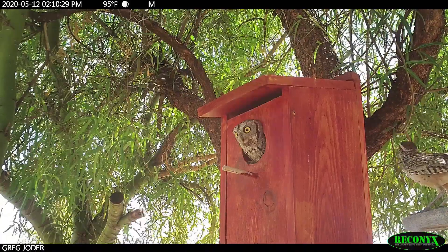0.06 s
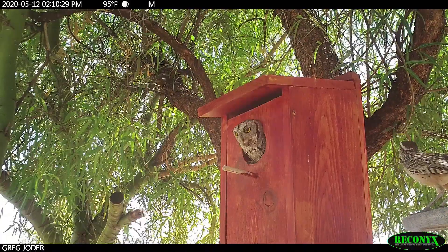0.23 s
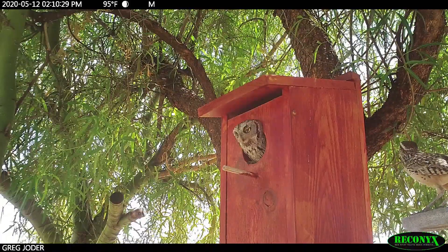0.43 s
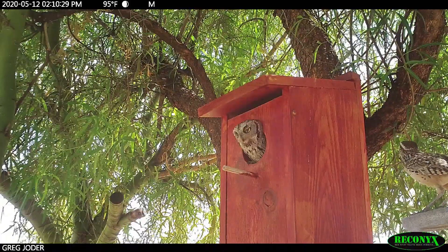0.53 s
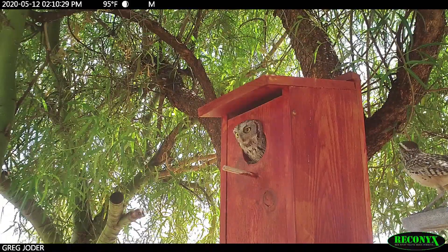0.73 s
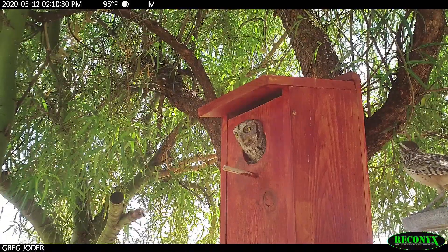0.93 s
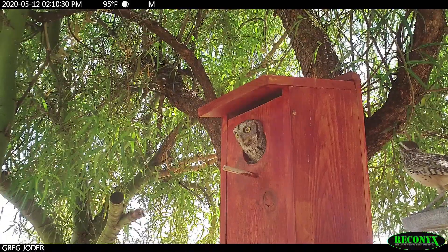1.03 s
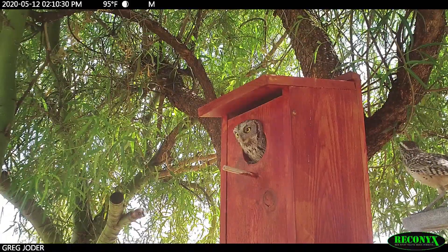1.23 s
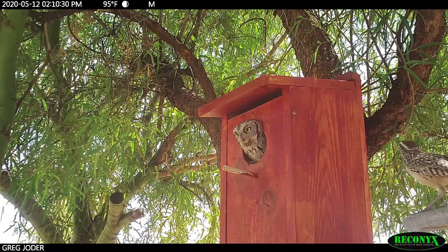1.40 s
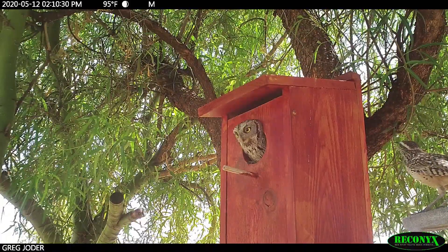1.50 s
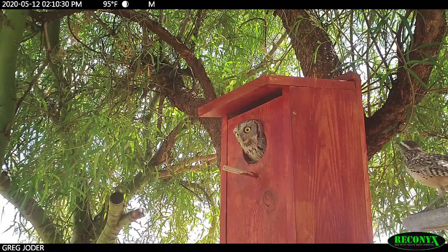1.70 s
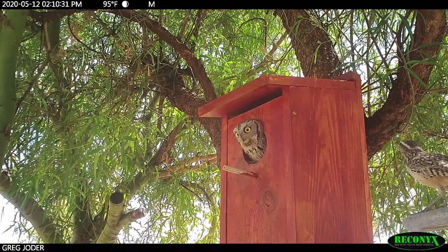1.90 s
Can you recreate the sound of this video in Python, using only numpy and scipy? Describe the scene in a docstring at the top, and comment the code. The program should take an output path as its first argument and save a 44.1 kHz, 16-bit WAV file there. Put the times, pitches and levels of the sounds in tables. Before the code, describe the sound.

Harsh buzzy chatter of a scolding wren near a nest box, ending with a soft wing flutter

```python
"""A wren on a branch close to the microphone is heard first, fading in, scolding in seven rasps.
Each rasp is a run of fast throbs, and each throb is a cluster of clicks ringing in throat and beak.
A rustle of wings follows, made of dense noise grains under a quick rise and decay, and one short chip.
Far off are thin falling whistles and a faint two-partial hoot, made of sines, and a low rumble of
filtered noise. Two close microphone ports receive the sound with a phase difference."""
import sys
import numpy as np
from scipy import signal
from scipy.fft import rfft, irfft
from scipy.io import wavfile

SR = 44100
rng = np.random.default_rng(int(sys.argv[2]) if len(sys.argv) > 2 else 0)


def file_out(sig):
    """Save sig as 16-bit WAV at sys.argv[1]."""
    # one column per channel
    cols = np.atleast_2d(sig).T
    # limit, then scale
    lim = np.clip(cols, -1, 1)
    pcm = np.round(lim * 32767).astype(np.int16)
    wavfile.write(sys.argv[1], SR, pcm)


N = 85995
T = np.arange(N) / SR

# Timing of each rasp: (first throb [s], last throb [s], throbs [count])
RASP_TIMES = [(-.045, .1105, 20), (.157, .303, 19), (.356, .5305, 23), (.588, .768, 24), (.856, 1.076, 28),
              (1.1925, 1.4, 26), (1.472, 1.6205, 19)]
# Strength of each rasp before VOICE_GAIN_DB:
# (level [dB], rise over the rasp [dB], weakness of the first throb [dB])
RASP_LEVELS = [(-19.5, -9.5, 15), (-20, -2.2, 11), (-20.5, 4, 4.5), (-19, 3.9, 9.5), (-19, 4.6, 16.5),
               (-19.5, 0.7, 13), (-19, -1.9, 14.5)]
# Relative strength of the successive clicks in a throb: level [dB]
CLICK_LEVELS = [-4, 0, 0, -4, -12, -20]
# Throat resonances, driven by longer puffs: (frequency [Hz], width [Hz], relative level [dB])
THROAT_MODES = [(1502, 128, -23.5), (2072, 350, -18.5), (2780, 560, -15), (4495, 430, -26.5)]
# Beak resonances, driven by the clicks: (frequency [Hz], width [Hz], relative level [dB])
BEAK_MODES = [(5340, 1630, -15.5), (6193, 1015, 4), (7850, 945, 0.5), (8506, 320, -1), (9570, 330, -21)]
# Relative spectrum of the wing rustle: (frequency [Hz], level per Hz [dB])
WING_SPECTRUM = [(500, -20), (1000, -20), (1650, -7.5), (2500, -16), (4500, -11.5), (6800, -1), (10200, -4),
                 (12000, -15), (15000, -49)]
# Far whistles: (start [s], end [s], first frequency [Hz], last frequency [Hz])
WHISTLE_GLIDES = [(1.62, 1.705, 5150, 4600), (1.76, 1.89, 4650, 4200), (1.775, 1.835, 5350, 5050),
                  (1.14, 1.18, 6450, 6350)]
# Strength of each whistle: level [dB]
WHISTLE_LEVELS = [-56, -61, -61, -62]
# Far hoot, fundamental and second partial: (start [s], end [s], frequency [Hz])
HOOT_TONES = [(.81, .93, 808), (.77, .823, 1616), (.829, .87, 1616)]
# Strength of each hoot tone: level [dB]
HOOT_LEVELS = [-63, -60, -59]
# Relative spectrum of the background air: (frequency [Hz], level per Hz [dB])
AIR_SPECTRUM = [(20, -7), (40, 0), (80, -16.5), (200, -28), (450, -43), (800, -39), (1300, -44.5),
                (4000, -48.5), (7000, -54), (15000, -59)]
# Course of the rumble and hums: (time [s], level [dB])
RUMBLE_LEVELS = [(0.3, -68.5), (0.68, -59.5), (1.118, -60.5), (1.38, -56.5), (1.71, -59), (1.83, -53.5),
                 (1.95, -57.5)]
# Hums in the rumble: (frequency [Hz], width of each of two resonances [Hz], level relative to RUMBLE_LEVELS [dB])
HUM_BANDS = [(55, 9, 3), (118, 12, -7), (160, 12, -12)]
# Correlation of the air between the ports: (frequency [Hz], likeness [-1 to 1])
PORT_LIKENESS = [(60, 0.83), (180, 0.7), (550, 0.69), (1650, 0.54), (4970, 0.02), (15000, 0.44)]
# Phase lag of the left port behind the right: (frequency [Hz], lag [rad])
PORT_LAG = [(300, .1), (3100, .35), (4100, 1.1), (5500, 1.85), (7900, 2.0), (9500, 2.8), (11500, 3.3),
            (15000, 4.5)]
# Steady offset, one row per port: (offset [full scale])
PORT_OFFSET = [
    [.002],
    [.0052],
]

# Throbs: timing curvature, standard deviations, time for the first throb's weakness to vanish
SLOWING, THROB_JITTER_S, THROB_SPREAD_DB = .025, .00025, .4
ATTACK_S, LAST_THROB_DB = .02, -8
CLICK_GAP_S, CLICK_JITTER_S, CLICK_SPREAD_DB = .0011, .00025, 1.5
TICK_LEAD_S, TICK_DB = .0055, -21  # relative to the rasp level
# Excitation: exponential decay times, noise and click shares, breath relative to the throbs
BEAK_PUFF_S, THROAT_PUFF_S, PUFF, THROAT_CLICK, BREATH_DB = .00025, .0018, .25, .6, -28
TOP_HZ, BOTTOM_HZ = 10800, 1160
TREBLE_HZ, TREBLE_DB, BODY_DB, VOICE_GAIN_DB = 9700, -26.5, -36, 26.5
WING_S, WING_ATTACK_S, WING_HOLD_S, WING_T60_S = 1.727, .01, .03, .16
WING_GRAINS_PER_S, WING_DB = 1700, -34.5
CHIP_S, CHIP_HZ, CHIP_T60_S, CHIP_DB = 1.862, 7000, .04, -46
NEAR_T60_S, NEAR_DB, ECHO_T60_S, ECHO_DB = .08, -16, .3, -24
HISS_DB = -57.5
# Left port gains; the right port has the opposite sign
LEFT_DB, LEFT_BASS_DB = -.5, -1.0
CEILING, STOPBAND_HZ = .36, 16100
FADE_SLOPE_S, FADE_START, FADE_POWER = .7, .052, 1.25  # ramp gains 1 per FADE_SLOPE_S


def rasps():
    """Source and filter: throbs of clustered clicks, with air between, excite throat and beak modes."""
    clicks, breath = np.zeros(N + SR), np.zeros(N)
    for (first, last, throbs), (level_db, swell_db, weak_db) in zip(RASP_TIMES, RASP_LEVELS):
        u = np.linspace(0, 1, throbs)
        progress = u - SLOWING * u * (1 - u)  # gaps lengthen along the rasp
        throb_s = first + (last - first) * progress + THROB_JITTER_S * rng.standard_normal(throbs)
        weakness = np.clip(1 - (throb_s - first) / ATTACK_S, 0, 1)
        throb_db = level_db + swell_db * (u - .5) - weak_db * weakness + LAST_THROB_DB * (u == 1)

        during = (T > first) * (T < last + 4 * CLICK_GAP_S)
        breath += amp(np.interp(T, throb_s, throb_db) + BREATH_DB) * during

        chance = rng.standard_normal((throbs, 13))  # 6 timings, 6 click levels, 1 throb level
        at = throb_s[:, None] + CLICK_GAP_S * (np.arange(6) - 2) + CLICK_JITTER_S * chance[:, :6]
        spread_db = CLICK_SPREAD_DB * chance[:, 6:12] + THROB_SPREAD_DB * chance[:, 12:]
        size = amp(throb_db[:, None] + np.array(CLICK_LEVELS) + spread_db)
        # a faint tick leads each rasp
        at = np.append(at, first - TICK_LEAD_S)
        size = np.append(size, amp(level_db + TICK_DB))
        np.add.at(clicks, (at[at > 0] * SR).astype(int), size[at > 0])

    clicks = clicks[:N] + 1e-18
    noise = rng.standard_normal((2, N))
    sharp = clicks + (PUFF * dying(clicks, BEAK_PUFF_S) + breath) * noise[0]
    soft = THROAT_CLICK * clicks + PUFF * dying(clicks, THROAT_PUFF_S) * noise[1]
    voice = resonances(sharp, BEAK_MODES) + resonances(soft, THROAT_MODES)
    voice = butter(butter(voice, TOP_HZ, "low", order=8), BOTTOM_HZ, "high", order=4)
    # excitation that bypasses the resonances
    treble = amp(TREBLE_DB) * butter(sharp, [TREBLE_HZ, 15000], "band", order=2)
    body = amp(BODY_DB) * butter(soft, [300, 1200], "band", order=2)
    return amp(VOICE_GAIN_DB) * (voice + treble + body)


def wings():
    """Shot noise: dense feather grains rise fast and decay exponentially; a resonant noise chip follows."""
    struck = rng.random(N) < WING_GRAINS_PER_S / SR
    grains = struck * rng.standard_normal(N) + .15 * rng.standard_normal(N)
    rise = np.clip((T - WING_S) / WING_ATTACK_S, 0, 1)
    decay = amp(-60 * np.maximum(T - WING_S - WING_HOLD_S, 0) / WING_T60_S)
    rustle = amp(WING_DB) * rise * decay * rms_one(coloured(grains, WING_SPECTRUM))

    chip_decay = amp(CHIP_DB - 60 * np.maximum(T - CHIP_S, 0) / CHIP_T60_S)
    chip_tone = rms_one(resonance(rng.standard_normal(N), CHIP_HZ, 500))
    return rustle + (T > CHIP_S) * chip_decay * chip_tone


def leaves(x):
    """Diffuse scattering from trunk, box and foliage: convolution with decaying noise, independent per port."""
    t = T[:SR // 2]
    near = amp(NEAR_DB) * rms_one(amp(-60 * t / NEAR_T60_S))
    echo = amp(ECHO_DB) * rms_one(amp(-60 * t / ECHO_T60_S))
    response = (near + echo) * rng.standard_normal((2, len(t))) / np.sqrt(len(t))
    return signal.fftconvolve(x[None], response, axes=1)[:, :N]


def ports(x):
    """Interaural-style phase difference: the left port lags the right, more so in the treble."""
    lag = at_hz(PORT_LAG, np.fft.rfftfreq(N, 1 / SR))
    turn = np.exp(-.5j * lag * np.array([[1], [-1]]))
    return irfft(rfft(x) * turn, N) * amp([[LEFT_DB], [-LEFT_DB]])


def far_whistles():
    """Frequency glide and amplitude modulation: falling sines multiplied by slow noise."""
    tones = 0
    for (start, end, from_hz, to_hz), db in zip(WHISTLE_GLIDES, WHISTLE_LEVELS):
        hz = np.interp(T, [start, end], [from_hz, to_hz])
        phase = 2 * np.pi * np.cumsum(hz) / SR
        tones = tones + amp(db) * swell(start, end) * np.sin(phase)
    waver = rms_one(butter(rng.standard_normal(N), 200, "low", order=2) + .07)
    return tones * waver


def far_hoot():
    """Harmonic series of two partials: sines of steady pitch, each rising and falling smoothly."""
    return sum(amp(db) * swell(start, end) ** .5 * np.sin(2 * np.pi * hz * T)
               for (start, end, hz), db in zip(HOOT_TONES, HOOT_LEVELS))


def air():
    """Partly correlated noise fields: rumble with narrow-band, wavering hums, and faint hiss."""
    mid, side = rfft(rng.standard_normal((2, N)))
    hz = np.fft.rfftfreq(N, 1 / SR)
    alike = np.clip(at_hz(PORT_LIKENESS, hz), -1, 1)
    # equal power at each port, with the side part in opposite sign
    pair = np.sqrt(1 + alike) * mid + np.sqrt(1 - alike) * side * [[1], [-1]]
    both = rms_one(irfft(amp(at_hz(AIR_SPECTRUM, hz)) * pair, N))
    low = butter(both, 405, "low", order=2)
    hums = sum(amp(db) * rms_one(resonance(resonance(rng.standard_normal(N), f, w), f, w))
               for f, w, db in HUM_BANDS)
    level = amp(np.interp(T, *np.transpose(RUMBLE_LEVELS)))
    rumble = (low + hums) * level * amp([[LEFT_BASS_DB], [-LEFT_BASS_DB]])
    return rumble + amp(HISS_DB) * rms_one(both - low)


def amp(db):
    """Decibel definition: amplitude ratio of a level."""
    return 10 ** (np.asarray(db) / 20)


def rms_one(x):
    """Normalization of effective value: scale to unit root mean square."""
    return x / np.sqrt(np.mean(x ** 2) + 1e-20)


def at_hz(points, hz):
    """Logarithmic frequency scale: interpolate a table along it."""
    table = np.array(points)
    return np.interp(np.log(hz + 1), np.log(table[:, 0]), table[:, 1])


def butter(x, hz, kind, order):
    """Maximally flat (Butterworth) filtering."""
    return signal.sosfilt(signal.butter(order, hz, kind, fs=SR, output="sos"), x)


def resonance(x, hz, width_hz):
    """Damped oscillator: a pole pair whose radius sets the bandwidth."""
    r = np.exp(-np.pi * width_hz / SR)
    feedback = [1, -2 * r * np.cos(2 * np.pi * hz / SR), r * r]
    return signal.lfilter([(1 - r * r) / 2, 0, (r * r - 1) / 2], feedback, x)


def resonances(x, table):
    """Modal superposition: parallel resonances of alternating sign."""
    return sum((-1) ** k * amp(db) * resonance(x, hz, w) for k, (hz, w, db) in enumerate(table))


def dying(x, decay_s):
    """Exponential relaxation: each impulse decays with the given time constant."""
    return signal.lfilter([1], [1, -np.exp(-1 / (decay_s * SR))], x)


def coloured(x, spectrum):
    """Spectral shaping: multiply the Fourier transform by a table of levels."""
    return irfft(rfft(x) * amp(at_hz(spectrum, np.fft.rfftfreq(N, 1 / SR))), N)


def swell(start, end):
    """Half-sine envelope: smooth rise and fall between two times."""
    return np.sqrt(np.sin(np.pi * np.clip((T - start) / (end - start), 0, 1)) ** 2 + 1e-12)


def scene():
    """Superposition: direct and scattered sound of the near bird, far calls and air."""
    near = rasps() + wings()
    return ports(near) + leaves(near) + far_whistles() + far_hoot() + air()


def record(dry):
    """Saturation and band limiting: rounded peaks, fade-in, steady offset, steep cut at the top."""
    rounded = CEILING * np.tanh(dry / CEILING)
    fade = np.clip(T / FADE_SLOPE_S + FADE_START, 0, 1) ** FADE_POWER
    top_cut = signal.cheby2(16, 70, STOPBAND_HZ, fs=SR, output="sos")
    return signal.sosfilt(top_cut, rounded * fade + PORT_OFFSET)


dry = scene()
out = record(dry)
file_out(out)
```